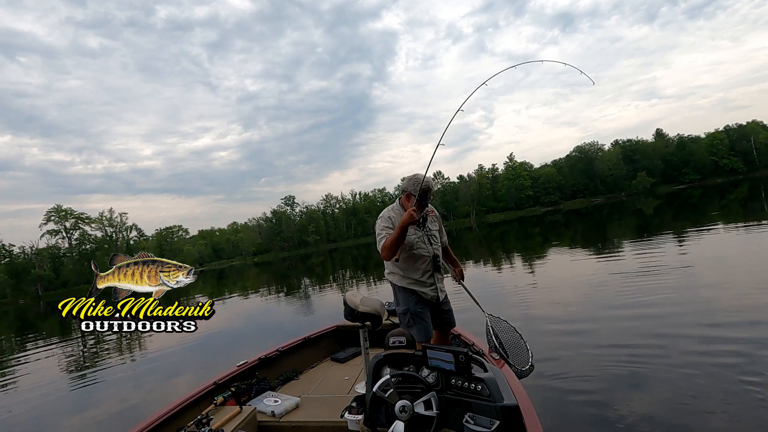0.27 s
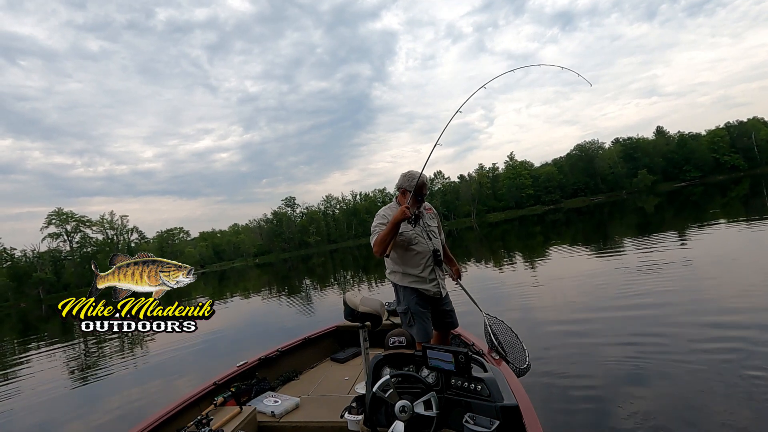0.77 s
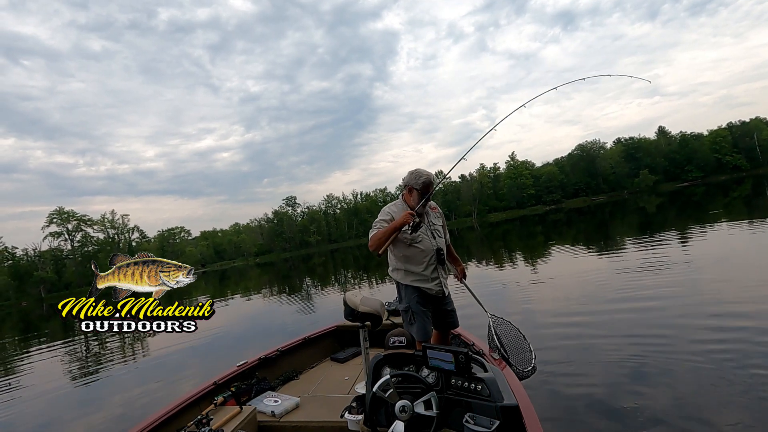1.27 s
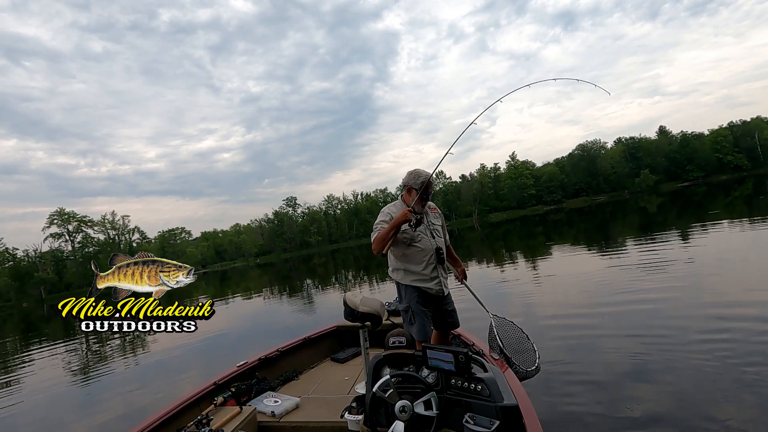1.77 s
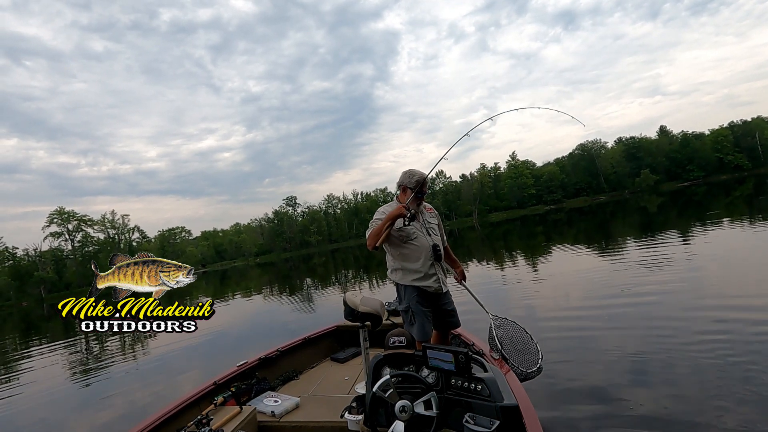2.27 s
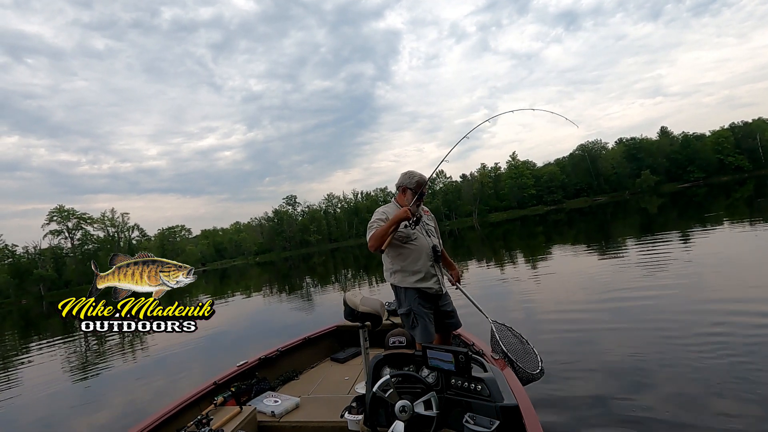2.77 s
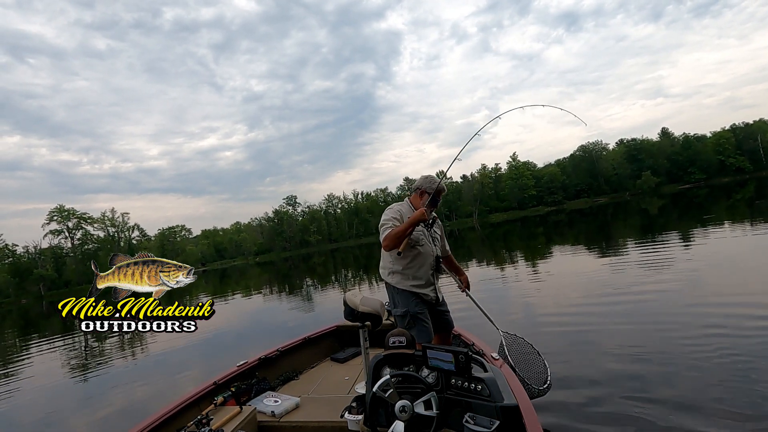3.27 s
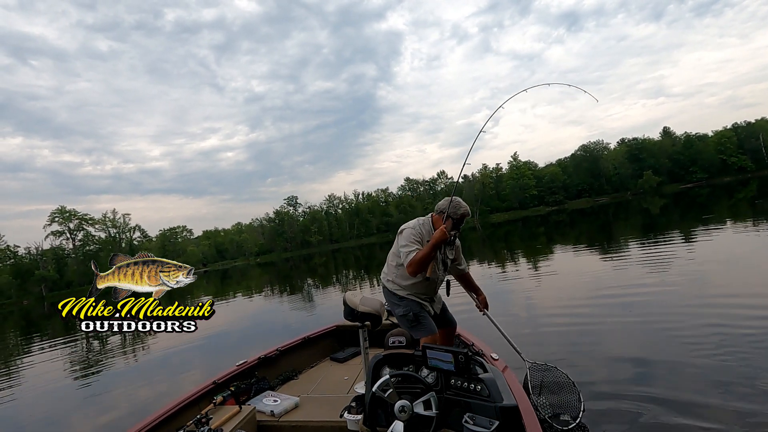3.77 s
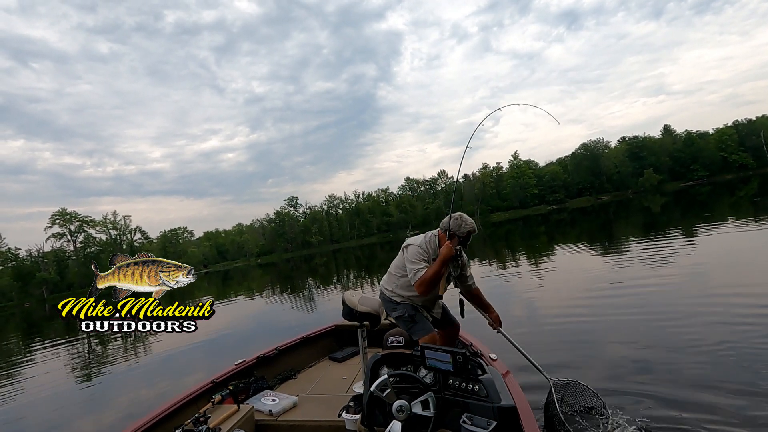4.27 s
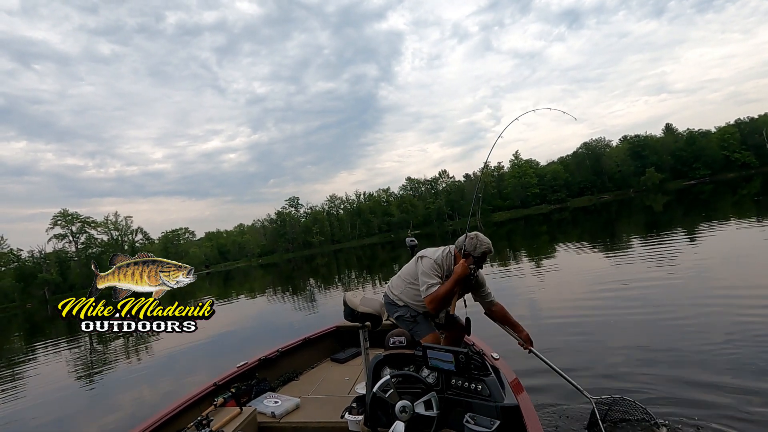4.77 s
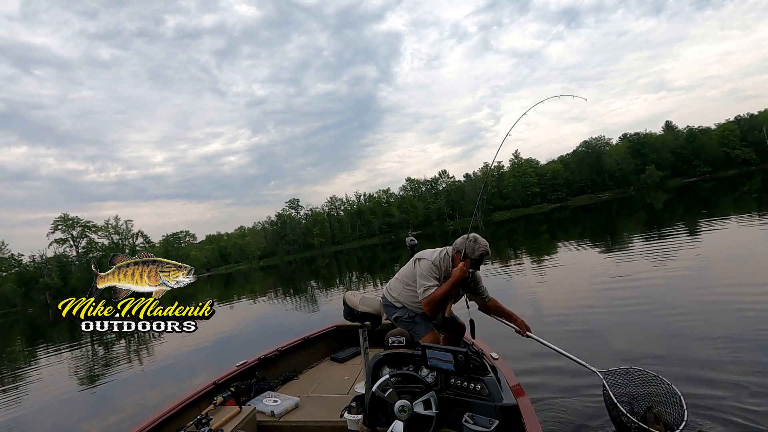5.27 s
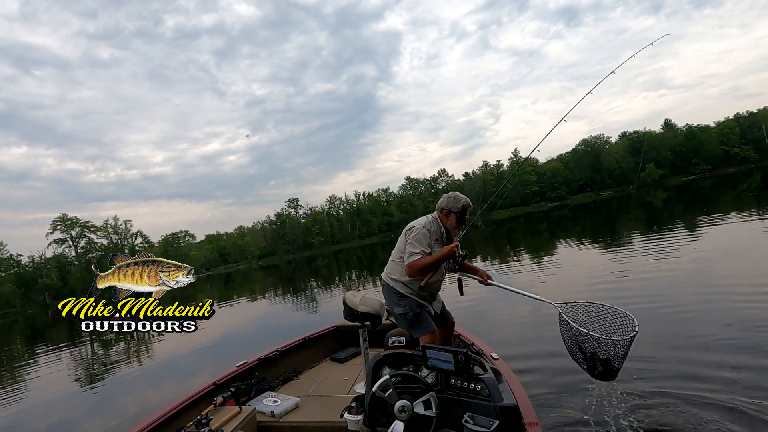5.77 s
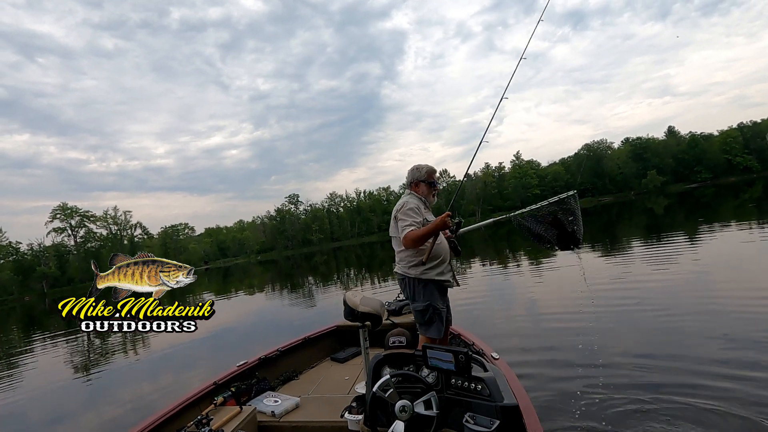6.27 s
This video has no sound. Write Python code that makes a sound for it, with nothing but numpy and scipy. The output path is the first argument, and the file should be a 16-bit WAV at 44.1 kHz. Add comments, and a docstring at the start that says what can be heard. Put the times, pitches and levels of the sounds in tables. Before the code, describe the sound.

Outdoors on calm water, heard close beside a small boat, with a very faint hum, soft air and distant, blurred bird whistles. From 0 to 1.3 s there are only single drops and small gulps, notably near 0.1 and 0.35 s; a tight cluster of plops comes at 1.35-1.5 s, then isolated plinks at 1.85 and 2.7 s. A faint gritty scrape at 2.9 s leads to a loud, bright metal knock at 3.1 s with quick rebounds and short ringing. A second scrape and dry clack at 3.7 s rattles briefly, with soft hull thumps. From 3.9 s plops and gurgles gather; 4.35-4.9 s is a lively bubbly thrash with wet slaps. It eases around 5.1-5.3 s, then builds again from 5.45 s as water spills from the rising net, densest at 5.9-6.3 s, ending in crisp, high dripping until 6.5 s.

```python
"""A hooked fish stirs calm river water beside a small fishing boat: gulps, plops and drips are single ringing
bubbles, and the churn is noise and random impulses through a bank of gliding bubble tones.
The metal net handle knocks (noise crack, falling zip, ringing modes) and scrapes (gritty noise in resonances)
on the gunwale; the fish thrashes in the net, and water pours and drips from the lifted mesh.
Behind: soft hull thumps, far birds as gliding sines, a faint low hum, light air and wind as shaped noise."""
import sys
import numpy as np
from scipy import signal
from scipy.fft import rfft, irfft, next_fast_len
from scipy.io import wavfile
from scipy.ndimage import uniform_filter1d

SR = 44100
rng = np.random.default_rng(int(sys.argv[2]) if len(sys.argv) > 2 else 0)


def materialize(psi):
    """Save the field psi as 16-bit PCM at rate SR to the path in sys.argv[1].

    A 1-D psi becomes a single channel; in a 2-D psi each row is a channel.
    """
    bounded = np.clip(np.atleast_2d(psi).T, -1, 1)
    quanta = np.round(bounded * 32767).astype(np.int16)
    wavfile.write(sys.argv[1], SR, quanta)


N = 287532

# blurred chorus of birds along the shore: (time [s], level [dB])
CHORUS_LEVEL = [(0.0, -71.5), (0.5, -82), (0.78, -66.5), (1.07, -74), (2.1, -73.5), (2.45, -69),
                (3.2, -70.5), (3.56, -72.5), (3.84, -65), (4.0, -72)]
WOBBLE_DB, WOBBLE_OCTAVES = 2, .04  # rms shake of pockets and bubbles as they ring


def gain_of(db):
    """Decibels to an amplitude factor."""
    return 10 ** (np.asarray(db) / 20)


def evened(x):
    """Scales to rms 1."""
    return x / np.sqrt(np.mean(x ** 2) + 1e-20)


def read(points, hz):
    """Reads a spectrum table on a log-frequency axis."""
    f, value = np.transpose(points)
    return np.interp(np.log(hz + 1), np.log(f + 1), value)


def along(rows):
    """Interpolates the columns of a curve table at every sample."""
    s, *columns = np.transpose(rows)
    return [np.interp(np.arange(N) / SR, s, c) for c in columns]


def add(mix, s, sound):
    """Mixes a sound in at s seconds."""
    part = mix[round(s * SR):][:len(sound)]
    part += sound[:len(part)]


def colour(x, db_of):
    """Filters by a gain in dB given as a rule of frequency."""
    hz = np.fft.rfftfreq(x.shape[-1], 1 / SR)
    return irfft(rfft(x) * gain_of(db_of(hz)), x.shape[-1])


def band(x, hz, width):
    """A resonance with gain 1 at its centre."""
    return signal.lfilter(*signal.iirpeak(hz, hz / width, SR), x)


def smooth_twice(x, size):
    """Two running averages: turns noise into slow random motion."""
    return uniform_filter1d(uniform_filter1d(x, size=size), size=size)


def bubble(hz, t60, glide, rise_s=.0006):
    """A trapped bubble: a dying tone whose pitch glides by this many octaves in each third of t60."""
    t = np.arange(0, t60 + .001, 1 / SR)
    pitch = np.minimum(hz * 2 ** (glide * t / (t60 / 3)), SR * .4)
    tone = np.sin(2 * np.pi * np.cumsum(pitch) / SR)
    return tone * gain_of(-60 * t / t60) * (1 - np.exp(-t / rise_s))


def echoes(x, t60, wet_db):
    """Direct sound plus a short scatter of reflections, different in each channel."""
    t = np.arange(round(.4 * SR)) / SR
    sparse = rng.random((2, len(t))) < .05
    taps = rng.standard_normal((2, len(t))) * sparse * gain_of(-60 * t / t60) * (t > .002)
    taps /= np.linalg.norm(taps, axis=1, keepdims=True)
    mono = np.atleast_2d(x).mean(0)[None]
    return x + gain_of(wet_db) * signal.fftconvolve(mono, taps, axes=1)[:, :N]


def gulps():
    """Air pockets of many sizes: mostly long gulps, plus a few short, steep chirps; pitch bends late, up or down."""
    # (start [s], level before fade and shake [dB], first pitch [Hz], length [s], glide [octaves],
    #  fade, negative swells [dB])
    pockets = [(0.059, -41, 608, 0.054, 1.24, 2.5), (0.354, -37.5, 660, 0.0094, 1.5, 29),
               (0.372, -56, 650, 0.016, .1, 3), (.465, -64, 600, 0.04, -0.1, 0),
               (.525, -65, 600, .03, 0.1, 3), (0.981, -58, 1045, 0.052, -.3, 6),
               (1.372, -57, 650, 0.034, 0.15, 2), (1.412, -61, 680, .03, .1, 0),
               (1.448, -40, 590, 0.03, 0.45, 7), (1.48, -57, 700, .04, -.15, 9),
               (3.204, -56, 618, 0.04, -0.2, 20), (3.945, -58, 1300, .05, -.5, 0),
               (4.043, -54, 530, 0.02, .1, 14), (4.17, -62, 440, .04, .5, -3),
               (4.208, -50, 640, 0.085, 0.1, 8), (3.845, -60, 680, .03, .1, 2), (4.3, -47, 724, .012, 0, 8),
               (4.425, -53, 1020, .015, 0, 4), (4.587, -50, 1250, .012, -.1, 6),
               (4.37, -53, 330, 0.025, 0.3, 8), (4.398, -51, 549, 0.02, 0, 4),
               (4.524, -46, 830, 0.055, -.35, 12), (4.526, -59, 397, 0.1, 0.05, 8),
               (4.59, -57, 632, .04, .3, 0), (4.615, -51, 983, .028, .35, 0),
               (4.645, -60, 663, .042, .7, -5), (4.805, -50, 760, .022, .5, 0),
               (4.822, -58, 600, .028, .15, 0), (4.873, -39, 470, 0.082, 0.45, 28),
               (5.377, -56, 652, .03, .15, 3), (5.892, -48, 955, 0.053, 0.1, 6),
               (5.988, -43, 620, 0.036, -.05, 3), (6.108, -44, 625, 0.032, -0.1, 2),
               (6.3194, -44, 2370, 0.005, 3, -13), (6.3658, -44.5, 1530, 0.0028, 1.7, -13),
               (6.4406, -39, 2900, 0.0047, 2.06, -11), (6.3987, -41, 1947, 0.01, 2, -15.5),
               (6.301, -46, 1676, .018, 2, 1), (6.392, -52.5, 1294, 0.0098, -1.5, 2),
               (6.504, -40.5, 990, 0.032, 0.5, 14)]
    out = np.zeros(N)
    shake = evened(smooth_twice(rng.standard_normal((len(pockets), 2, 6000)), 150))
    for (s, db, hz, length, glide, fade_db), (loud, wobble) in zip(pockets, shake):
        u = np.arange(0, 1, 1 / (length * SR))
        pitch = hz * 2 ** (glide * u ** 2.49 + WOBBLE_OCTAVES * wobble[:len(u)])
        edges = np.minimum(1, u * length / 0.00069) * np.minimum(1, (1 - u) / 0.2)
        level = gain_of(db - fade_db * u + WOBBLE_DB * loud[:len(u)])
        add(out, s, level * np.sin(2 * np.pi * np.cumsum(pitch) / SR) * edges)
    return out


def plops():
    """Short bubbles pinch off one by one: each tone swells, glides and dies within eight swell times."""
    # (start [s], peak before the shake [dB], pitch at 1.5 swells [Hz], swell, at least 0.0004 [s],
    #  glide over four swells [octaves])
    pinches = [(0.349, -53, 2750, 0.0018, -0.18), (0.3491, -49, 1100, 0.0014, 0.62),
               (0.382, -58, 1120, 0.0044, 0.94), (0.388, -52, 1291.0, 0.0023, 0.31),
               (0.59, -58, 1270, 0.0026, -0.47), (0.675, -55, 1370, 0.0023, 0.44),
               (0.847, -57, 1570, 0.002, 0.49), (1.3648, -54, 1560, 0.0014, -0.22),
               (1.3751, -49.5, 1863.0, 0.0022, -0.1), (1.3895, -47, 1560, 0.0023, -0.07),
               (1.409, -48, 1880, 0.0022, -0.29), (1.421, -48, 1800, 0.0015, 1.2),
               (1.4162, -47, 1120, 0.0073, -0.35), (1.4505, -45.5, 1894.0, 0.002, 0.42),
               (1.4675, -54, 2100, 0.0028, 0.38), (2.138, -62, 1390, 0.0022, -0.31),
               (2.781, -58, 1320, 0.0022, 0), (3.797, -54, 980, 0.0031, -0.35),
               (3.811, -59, 2020, 0.005, -0.1), (3.833, -52, 1560, 0.003, 0.45),
               (3.853, -55, 2490, 0.0014, 0.2), (3.929, -47.5, 1900, 0.0015, 0.94),
               (3.935, -54, 1490, 0.0015, 0.4), (3.9519, -47, 1390, 0.0017, -0.3),
               (3.9613, -40.6, 1500, 0.0014, -0.42), (4.02, -52, 1116, 0.0053, -0.42),
               (4.04, -42, 1015, 0.0027, -0.2), (4.0566, -34.5, 1180, 0.0011, -0.43),
               (4.07, -44.5, 1173, 0.0039, -0.017), (4.105, -56, 1050, 0.0073, 0.12),
               (4.1159, -51.5, 2220, 0.0022, 0.17), (4.1251, -52, 1240, 0.004, -0.49),
               (4.138, -55, 2800, 0.0013, -0.094), (4.157, -57, 1350, 0.0015, -0.42),
               (4.166, -55, 2230, 0.003, -0.24), (4.192, -49.5, 1360, 0.0036, -0.36),
               (4.2048, -48.5, 1280, 0.0056, 0.56), (4.26, -41.5, 5600, 0.00072, -0.55),
               (4.2783, -48, 1593.0, 0.0016, -0.2), (4.3576, -36.5, 784, 0.0012, 0.27),
               (4.3723, -45, 2370, 0.0059, 0.21), (4.384, -36, 1520, 0.002, 0.58),
               (4.3964, -40, 1890, 0.00086, -0.63), (4.401, -39, 4412.0, 0.0008, 0.53),
               (4.4093, -34, 3770, 0.00069, 0.62), (4.4104, -36, 1500, 0.0016, -0.091),
               (4.415, -40, 2560, 0.0014, 0.43), (4.5085, -31, 852, 0.0033, 0.14),
               (4.513, -30, 1320, 0.00086, 0.49), (4.5176, -40.5, 3800, 0.00084, -0.31),
               (4.5263, -43.8, 1240, 0.0044, 0.6), (4.603, -44, 3050, 0.0014, -0.078),
               (4.6245, -41, 2260, 0.0015, 0.35), (4.6437, -46, 2927.0, 0.0012, 0.031),
               (4.6634, -42, 3371.0, 0.00075, -0.25), (4.7096, -49, 1330, 0.0033, 0.04),
               (4.7117, -34, 1820, 0.00068, -0.43), (4.7443, -42.5, 756, 0.0022, -0.25),
               (4.7626, -44, 1419.0, 0.0011, -0.74), (4.7786, -46.5, 1266, 0.0049, 1.1),
               (4.7785, -42.5, 3859.0, 0.0017, 0.67), (4.7987, -39, 2497.0, 0.00088, -0.16),
               (4.8346, -38, 4340, 0.0011, -0.26), (4.872, -43, 2210, 0.0012, -0.12),
               (4.9874, -42.5, 1260, 0.0012, 1.6), (5.0037, -41, 1720, 0.00072, -0.041),
               (5.0146, -50, 1060, 0.0017, 0.29), (5.078, -49.5, 1430, 0.0029, -0.12),
               (5.111, -46.5, 1526, 0.0028, 0.9), (5.3512, -41.5, 2160, 0.001, 0.49),
               (5.3593, -42, 1710, 0.0011, 0.71), (5.3685, -48.5, 3300, 0.0024, 0.16),
               (5.3746, -44, 1770, 0.0022, -0.54), (5.3887, -47.5, 1020, 0.0041, -0.3),
               (5.4063, -43.5, 1430, 0.0032, -0.46), (5.472, -36, 1380, 0.0022, 0.035),
               (5.5142, -47, 4600, 0.0015, -0.039), (5.5233, -45, 2250, 0.0024, -0.15),
               (5.5258, -44, 4170, 0.0015, -0.22), (5.5491, -41, 2030, 0.0011, 0.31),
               (5.5622, -27, 1470, 0.0012, 0.025), (5.5702, -42, 2290, 0.0028, -0.0024),
               (5.58, -40.5, 1106, 0.0029, -0.11), (5.5912, -45, 3574.0, 0.00089, 0.0),
               (5.5924, -48, 1364, 0.0091, -0.86), (5.6347, -38, 2930, 0.001, 0.13),
               (5.664, -40, 1162.0, 0.0011, -0.2), (5.6744, -44, 1057, 0.0042, 0.65),
               (5.675, -41, 1610, 0.005, 0.0), (5.702, -36.5, 1330.0, 0.0006, -1.1),
               (5.7016, -47, 1000, 0.00072, -1), (5.737, -36.5, 1480, 0.00095, 0.95),
               (5.7804, -38, 890, 0.0032, -0.14), (5.7946, -32.0, 870, 0.0014, -0.77),
               (5.8093, -45, 1080, 0.0018, -0.5), (5.8102, -40, 1660, 0.0023, -0.25),
               (5.8338, -43.5, 2570, 0.0041, 0.43), (5.8359, -31, 1580, 0.0012, 0.0),
               (5.853, -40.5, 283, 0.0087, -0.18), (5.8589, -41.5, 1250, 0.0058, 0.7),
               (5.8655, -36.5, 2267.0, 0.00061, 0.4), (5.879, -43.5, 1290, 0.0041, 0.7),
               (5.8817, -43, 1580, 0.002, 0.051), (5.8927, -43.5, 1206, 0.0026, 0.17),
               (5.9302, -49, 1430, 0.00059, 0.7), (5.9802, -39, 1700, 0.0012, -0.5),
               (5.99, -41.5, 1246, 0.002, -0.77), (5.9937, -52, 3971.0, 0.0026, 0.24),
               (5.996, -44, 4440, 0.0023, 1.1), (6.0011, -38, 1862.0, 0.00082, 1.5),
               (6.0044, -54, 4140, 0.0053, 0.44), (6.0133, -36, 3760, 0.00071, 0.77),
               (6.021, -44, 1045, 0.0037, -1.1), (6.0373, -43, 1160, 0.0013, 0.0),
               (6.0488, -41, 930, 0.0013, 1), (6.0527, -36, 2080, 0.0013, -0.21),
               (6.0629, -35, 3500, 0.00069, -0.0015), (6.0703, -42.5, 1851.0, 0.0027, 0.066),
               (6.0718, -44, 860, 0.0032, 0.65), (6.1055, -53, 1033.0, 0.0033, 0.88),
               (6.109, -38, 2160, 0.0034, 0.25), (6.12, -50, 1180, 0.0036, 0.56),
               (6.1225, -36, 1730, 0.00056, 0.59), (6.128, -35, 3180, 0.0012, 1.5),
               (6.13, -51, 5060, 0.002, 0.17), (6.1356, -40, 3080, 0.0014, 0.82),
               (6.136, -42, 2680, 0.0019, 0.86), (6.1685, -40.5, 2660, 0.0056, 1.05),
               (6.1927, -37.5, 1774.0, 0.0015, -0.29), (6.2039, -47, 2000, 0.0077, -0.022),
               (6.2099, -42, 5150, 0.0008, -0.62), (6.2117, -53, 1670, 0.0014, 1.3),
               (6.2124, -42, 3270, 0.0024, 0.88), (6.225, -39, 4560, 0.00069, 0.81),
               (6.258, -41, 1970, 0.0012, 0.77), (6.2682, -46, 1820, 0.0021, 0.78),
               (6.3016, -34, 1850, 0.0007, -0.095), (6.469, -40.7, 1720, 0.00052, 0.33),
               (6.4734, -41, 2390, 0.0011, 0.66)]
    out = np.zeros(N)
    shake = evened(smooth_twice(rng.standard_normal((len(pinches), 2, 6000)), 60))
    for (s, db, hz, swell, glide), (loud, wobble) in zip(pinches, shake):
        u = np.arange(0, 8, 1 / (max(swell, .0004) * SR))
        pitch = hz * 2 ** (glide * (u - 1.5) / 4 + WOBBLE_OCTAVES * wobble[:len(u)])
        level = gain_of(db + WOBBLE_DB * loud[:len(u)])
        add(out, s, level * u * np.exp(1 - u) * np.sin(2 * np.pi * np.cumsum(pitch) / SR))
    return out


def drops():
    """Drops strike the surface: a wide burst as it tears open, a climbing trapped bubble and a bright tick."""
    # (start [s], bubble level [dB], bubble's first pitch [Hz], tick level re bubble [dB])
    strikes = [(0.0363, -46.5, 4500, -10.5), (0.0765, -35.5, 2850, -6), (0.107, -49, 2540, 0.5),
               (0.3446, -46, 2160, -28), (.698, -47.5, 2120, -28), (0.759, -36.5, 3180, -44),
               (.967, -52, 4000, -23), (1.1046, -48.5, 5170, -28), (1.1721, -48, 4850, 1.5),
               (1.2999, -44, 3060, -11), (1.3716, -41, 2820, -19), (1.405, -37, 4340, -25),
               (1.414, -47, 5450, -17), (1.462, -41.5, 4330, -39), (1.8361, -38.5, 2560, -12),
               (2.063, -57, 2280, -4), (2.3348, -50.5, 2390, -5), (2.702, -42, 4600, -3),
               (3.165, -40.5, 2670, -22), (3.5818, -49, 4360, -11), (3.9294, -45.5, 3500, -8),
               (3.949, -41, 4230, -15), (4.2575, -37, 2850, -12), (4.3333, -37.5, 2840, -10.5),
               (4.3974, -31.5, 3030, -29), (4.5077, -32.5, 2200, -22), (4.664, -46, 3740, 2),
               (4.681, -37.5, 2880, -17), (4.7091, -29, 3200, -11), (4.7316, -33, 5430, 1.5),
               (4.7347, -32, 4070, -17), (4.7464, -31, 2710, -25), (4.7622, -35, 2500, -22),
               (4.385, -28, 2770, -24), (4.7872, -34, 5450, -10), (4.825, -31.5, 3350, -15),
               (4.8508, -32.5, 1800, -25), (4.8597, -33, 2320, -18), (4.946, -36.5, 2680, -9),
               (5.1, -37.5, 2200, -26), (4.989, -47, 3140, -27.5), (5.235, -46.5, 2000, -13),
               (5.303, -46, 5040, -6), (5.323, -39, 2420, -27), (5.438, -39.5, 3140, -24),
               (5.5629, -33, 3130, -33), (5.651, -33.5, 3560, -32), (5.8065, -30, 2520, -40),
               (5.852, -28.5, 1860, -21), (5.8865, -35.5, 4000, -10), (5.918, -38, 3280, -17),
               (5.9628, -39.5, 3050, -3), (5.985, -31.5, 4100, -10), (6.0007, -33, 4540, -18),
               (6.048, -32, 2400, -8), (6.091, -37, 2630, -25), (6.2067, -31, 2020, -20),
               (6.218, -33, 3870, -24), (6.2558, -35, 5620, -9), (6.2613, -29.5, 2280, -23),
               (6.123, -40, 5550, 0.5), (6.3013, -30, 2270, -22), (6.3228, -32.5, 2820, -7),
               (6.3345, -41, 4500, -4), (6.3685, -33, 5800, -5.5), (6.3982, -26.5, 4730, -6.5),
               (6.4285, -33, 3900, -17.5), (6.455, -45, 3000, -7), (6.477, -33, 4130, -9.5)]
    longest_t60_s, largest_glide, smack_db = 0.017, 0.61, -4  # glide: octaves per third of t60
    out = np.zeros(N)
    noise = rng.standard_normal((len(strikes), 1200))
    ticks = band(noise[:, :300], 6560, 2500) * 7.84 * np.exp(-np.arange(300) / 19.0)
    smacks = band(noise[:, 300:], 4400, 1600) * np.exp(-np.arange(900) / 25.0)
    luck = rng.random((len(strikes), 2))
    for (s, db, hz, tick_db), tick, smack, (ring, climb) in zip(strikes, ticks, smacks, luck):
        trapped = bubble(hz, longest_t60_s * (1 + ring) / 2, largest_glide * climb, 0.000098)
        add(out, s, gain_of(db + smack_db) * smack)
        add(out, s, gain_of(db) * trapped)
        add(out, s, gain_of(db + tick_db) * tick)
    return out


def churn():
    """Swarms of bubbles of all sizes, released in clumps by small slaps of water, spread left and right."""
    # how hard the water churns: (time [s], level [dB], large bubbles re level [dB])
    stir = [(0, -75.5, -12), (.3, -81.5, -6.5), (1, -85, -11), (1.3, -91, 2.5), (2, -89.5, -17),
            (2.9, -89.5, 1), (3.2, -80, -7), (3.45, -82.5, -13), (3.7, -69.5, -9), (3.85, -71.5, -8),
            (3.97, -67.5, -16), (4.15, -70, -5.5), (4.25, -68.5, -6.5), (4.45, -61.5, -1), (4.6, -69.5, 0),
            (4.75, -59.5, -9.5), (4.9, -64, -7), (5.1, -69.5, 0), (5.28, -75, -9.5), (5.42, -66, -1),
            (5.6, -64, -4.5), (5.75, -66, 3.5), (5.95, -59, 3), (6.13, -58, -3), (6.155, -59, 3.5),
            (6.25, -60, -3.5), (6.4, -64, -26), (6.52, -65.5, -5)]
    # brief surges and lulls of the churn: (start [s], length [s], gain, negative is calmer [dB])
    surges = [(0.05, 0.098, 4), (0.363, 0.12, -2), (0.784, 0.15, 6.5), (1.352, 0.25, 11.5),
              (4.227, 0.14, 8), (4.365, 0.084, 9.5), (4.481, 0.14, 6.5), (4.72, 0.13, 2), (4.836, 0.047, 5),
              (5.034, 0.02, -2.5), (5.55, 0.018, 7), (5.636, 0.069, 6.5), (5.748, 0.14, 3),
              (5.954, 0.1, 3.5), (6.035, 0.064, 0.5), (6.077, 0.061, 2.5), (6.202, 0.031, 6.5),
              (6.25, 0.018, 0.5), (6.398, 0.011, 20.5)]
    # balance of bubble pitches: (frequency [Hz], gain [dB])
    swarm = [(450, -14.5), (800, 0.2), (1500, 4), (2500, 3), (4000, 7), (6000, 4.5), (9000, -2),
             (14000, -10.5)]
    sizes_hz = [706, 2230, 6000]  # centres of large, middle and fine bubbles
    fine_db, fine_follows = -75, 0.93  # fine spray at a churn level of -69 dB, and dB per dB of that level
    slaps_per_s, snap_hz, snap_db = 70., 3800, 13.5  # dry snap of a slap, dB re the middle bubbles
    bubbles_per_s, spread_db = 150.0, 3.0  # base rate at 1 kHz for each pitch; random loudness spread
    hiss_db, gurgle_db = -19.5, -3.0

    level, large = along(stir)
    levels = np.array([level + large, level, fine_db + fine_follows * (level + 69.0)])
    for s, length, db in surges:
        u = (np.arange(N) / SR - s) / length
        levels += db * np.clip(np.minimum(12 * u, 1.3 * (1 - u)), 0, 1)

    # slaps raise the chance of bubbles; calm water keeps a steadier trickle
    slaps = (rng.random(N) < slaps_per_s / SR) * np.minimum(rng.exponential(1, N), 1.6)
    t = np.arange(2000) / SR
    burst = 2.0 * np.exp(-t / 0.0043) * (1 - np.exp(-t / 0.0011))
    clumps = 0.27 + np.clip((-72 - level) / 8, 0, 2) + signal.oaconvolve(slaps, burst)[:N]
    spray = gain_of(hiss_db) * rng.standard_normal((2, N))
    spray[1] = 3.75 * spray[0] + 2.0 * spray[1]
    spray, clumped = spray.astype(np.float32), evened(clumps ** 0.051)

    size = next_fast_len(N + 6000)
    total = np.zeros((2, size // 2 + 1), complex)
    for k, hz in enumerate(np.geomspace(400, 14000, 44)):
        chance, luck = rng.random(N, np.float32), rng.random(2)
        gurgle = k % 2 and hz < 8000  # every other pitch: rarer bubbles that ring long
        rate = bubbles_per_s * np.sqrt(hz / 1000)
        if gurgle:
            cycles, glide = 30 + 40 * luck[0], -0.05 + 0.5 * luck[1]
            rate *= .3
        else:
            cycles, glide = 5 + 14 * luck[0], 0.0055 + 0.723 * luck[1]
        at = np.flatnonzero(chance < rate * clumps / SR)
        big, side = rng.random((len(at), 2)).T
        loud_db = spread_db * np.minimum(-np.log(big + 1e-9), 4)
        drive = np.zeros((2, N), np.float32)
        drive[:, at] = gain_of(loud_db + np.outer([1, -1], 1.7 * (side - .5)))
        drive = evened(drive)
        if gurgle:
            drive = gain_of(gurgle_db - 6.4 * max(np.log2(hz / 2500), 0)) * drive
        else:
            drive = drive + np.roll(spray, 999 * k, axis=1) * clumped * np.sqrt(hz / 2500)
        shares = [np.interp(np.log(hz), np.log(sizes_hz), row) for row in np.eye(3)]
        drive = np.float32(drive * gain_of(np.float32(shares @ levels + read(swarm, hz))))
        ring = bubble(hz, cycles / hz, glide, 2.0 / hz)
        total += rfft(drive, size) * rfft(np.float32(ring / np.linalg.norm(ring)), size)

    sides = gain_of(np.outer([1, -1], 3 * (rng.random(N) - .5)))
    snaps = slaps ** 2 * gain_of(levels[1] + snap_db) * sides
    total += rfft(snaps, size) * rfft(bubble(snap_hz, 5.8 / snap_hz, -.3, .00003), size)
    return irfft(total, size)[:, :N]


def knocks():
    """The net handle strikes the gunwale: a noise crack, a falling zip along the tube and ringing modes."""
    # (start [s], level [dB], contact decay [s], tilt about 3 kHz [dB per octave], ring re level [dB],
    #  zip length [s])
    hits = [(3.078, -10.5, .005, 5, -3, .0058), (3.0838, -18.5, .005, 1, 2, .002),
            (3.089, -25, .015, -4, -6, .002), (3.1245, -28.5, .006, 4, 3, .0048),
            (3.6893, -14.5, .0007, 5, -14, .001), (3.7035, -26, .005, 1, -9, .0015),
            (3.7165, -32, .0024, -4, -3, .002), (3.7335, -40, .003, 7, -6, .0015),
            (3.7407, -28, .0015, 5, -9, .0015), (3.7452, -31, .0015, 9, -9, .0015),
            (3.762, -42, .003, 0, -6, .002), (3.799, -43, .004, -6, -3, .002)]
    # modes of handle and gunwale: (frequency [Hz], gain before tilt [dB], t60 [s])
    metal = [(180, -5.5, 0.21), (244.4, -11, 0.36), (376, -2.5, 0.11), (463, 3.5, 0.054), (1248, 11, 0.049),
             (1690, 2.5, 0.13), (2183, 2, 0.049), (2450, -8, 0.034), (2715, 17, 0.037), (2860, 5.5, 0.052),
             (3230, -12, 0.037), (4040, -6, 0.039), (4200, 5, 0.064), (4380, 4.5, 0.06), (5080, -1, 0.035),
             (5110, 1, 0.038), (5820, -1, 0.044), (6600, 2.5, 0.045)]
    # crack colour before tilt: (frequency [Hz], gain [dB])
    crack_colour = [(60, -68), (200, 1), (700, 3), (1300, 13.5), (1700, 14.5), (1950, 0), (2300, 20),
                    (2800, 17.5), (4500, 14.5), (7000, 4.5), (10000, -2.5), (15000, -7)]
    zip_base_db, zip_per_tilt = -12, 1.87  # bright knocks zip more
    rise_share, delay_share = .8, .5  # blow's rise and zip's delay, in zip lengths
    out, t = np.zeros(N), np.arange(round(.3 * SR)) / SR
    fade = signal.windows.tukey(2 * len(t), .3)[len(t):]
    for row, noise in zip(hits, rng.standard_normal((len(hits), len(t)))):
        s, db, contact, tilt_db, ring_db, zip_s = row
        rise, delay = rise_share * zip_s, delay_share * zip_s
        zip_gain = gain_of(min(zip_base_db + zip_per_tilt * tilt_db, 0))
        blow = noise * np.where(t < rise, (t / rise) ** 2, np.exp(-(t - rise) / contact))
        crack = colour(blow, lambda f: read(crack_colour, f) + tilt_db * np.log2(f / 3000 + 0.01))
        modes = np.zeros(len(t))
        for f, mode_db, t60 in metal:
            decay = gain_of(mode_db + tilt_db * np.log2(f / 3000) - 60 * t / t60)
            modes += decay * np.sin(2 * np.pi * f * (t - rise))
        ring = modes * np.minimum(t / rise, 1) ** 2  # the ring builds up while the contact grows
        u = np.clip((t - delay) / zip_s, 0, 1)  # bending waves: the treble arrives first
        zip_pitch = 2600 + 4600 * (1 - u) ** 2.13
        zips = np.sin(2 * np.pi * np.cumsum(zip_pitch) / SR) * np.sin(np.pi * u) ** 0.43
        # the zip keeps to the middle band, with no bass
        zips = colour(zips, lambda f: read([(600, -26), (1500, 6.5), (2400, -5.5)], f))
        knock = zip_gain * zips
        knock += 0.94 * (1 - 0.33 * zip_gain) * crack / abs(crack).max()
        knock += gain_of(ring_db) * ring / abs(ring).max()
        add(out, s, gain_of(db) * knock * fade)
    return out


def slides():
    """The handle slides along the gunwale: gritty noise makes narrow bands of the metal sing."""
    # one list for each slide: (time [s], level [dB])
    rubs = [
        [(2.88, -80.5), (2.884, -77), (2.902, -59), (2.958, -55.5), (3.05, -77), (3.07, -49)],
        [(3.62, -61), (3.68, -55), (3.69, -35)],
    ]
    # singing bands: (frequency [Hz], width [Hz], gain before tilt [dB])
    singing = [(2338, 26, 8.5), (2490, 38, 5), (3580, 52, 2.5), (4380, 43, 6), (4610, 100, 0.5),
               (5400, 50, 0), (7350, 140, -9)]
    # tilt below 4600 Hz, one for each slide: [dB per octave]
    tilts = [0, 9]
    out = np.zeros(N)
    for rows, tilt_db in zip(rubs, tilts):
        s, db = np.transpose(rows)
        span = np.arange(s[0], s[-1], 1 / SR)
        noise = rng.standard_normal(len(span))
        roughness = evened(uniform_filter1d(rng.standard_normal(len(span)), size=200))
        grit = noise * gain_of(3.3 * roughness)
        sing = np.zeros(len(span))
        for f, width, band_db in singing:
            sing += gain_of(band_db + tilt_db * np.log2(min(f, 4600) / 4600)) * band(grit, f, width)
        level = gain_of(np.interp(span, s, db))
        add(out, s[0], level * evened(sing) * signal.windows.tukey(len(span), .1))
    return out


def hull():
    """The angler shifts: each soft thump is a few low swings that swell, sag in pitch and die."""
    # (start [s], level [dB], nominal pitch, swept from 1.3 to 0.72 times [Hz], length [s])
    thumps = [(1.11, -68, 35.0, 0.098), (1.768, -65.5, 48.4, 0.1), (3.105, -52, 40.4, 0.062),
              (3.553, -51.5, 44, 0.074), (3.702, -45.5, 169, 0.06), (3.746, -51, 32.3, 0.041),
              (3.79, -53, 200, 0.022), (3.87, -53.5, 34, 0.065), (5.945, -53.5, 163, 0.056),
              (6.21, -53, 200, 0.087), (6.293, -49.5, 44.7, 0.1)]
    out = np.zeros(N)
    for s, db, hz, length in thumps:
        u = np.arange(0, 1, 1 / (length * SR))
        swing = np.sin(2 * np.pi * hz * length * u * (1.3 - 0.29 * u))
        add(out, s, gain_of(db) * swing * np.sin(np.pi * u ** 0.41) ** 2)
    return out


def birds():
    """Far near-sine whistles over the chorus voices, fluttering in moving air and smeared by the trees."""
    # (start [s], length [s], level before flutter [dB], first, middle and last pitch before smoothing [Hz])
    whistles = [(0.539, 0.078, -64, 5350, 3200, 2100), (0.616, 0.033, -67, 2600, 3430, 3870),
                (0.654, 0.051, -65, 3950, 4020, 4220), (0.769, 0.15, -66.5, 3200, 3230, 3190),
                (0.843, 0.038, -60.5, 2350, 2450, 2620), (.88, 0.1, -73, 2320, 2600, 2400),
                (1.564, 0.042, -67, 4800, 4950, 4960), (1.63, 0.056, -64, 3300, 2980, 2270),
                (1.702, 0.069, -65.5, 2820, 3080, 2300), (1.77, 0.057, -63.5, 2360, 2980, 3570),
                (1.876, 0.21, -77.5, 5480, 5290, 5360), (2.411, 0.078, -62, 2910, 2985, 2380),
                (2.472, 0.06, -61.5, 2300, 2530, 2170), (2.474, 0.051, -66, 4700, 3590, 3080),
                (2.586, 0.055, -64.5, 4900, 3670, 3100), (2.629, 0.11, -70, 2500, 2510, 2740),
                (2.772, .05, -67, 2900, 3000, 3260), (3.37, 0.062, -71.5, 4730, 4910, 4880),
                (3.466, 0.075, -71, 4560, 3220, 2400), (3.535, 0.053, -73, 2300, 3210, 2870)]
    out = warblers()
    for s, length, db, *hz in whistles:
        pitch = np.interp(np.arange(0, 2, 2 / (length * SR)), range(3), hz)
        pitch = uniform_filter1d(pitch, size=400)
        tone = np.sin(2 * np.pi * np.cumsum(pitch) / SR)
        add(out, s, gain_of(db) * tone * signal.windows.tukey(len(pitch), .6))
    out *= gain_of(2.6 * evened(smooth_twice(rng.standard_normal(N), 350)))
    return echoes(out * gain_of([[1.5], [-1.5]]), 0.56, -1.8)


def warblers(count=9):
    """The far chorus: several voices whose pitch wanders and which break off at random."""
    slow = smooth_twice(rng.standard_normal((2, count, N // 64 + 2)), 22)
    wander, effort = (np.repeat(evened(v), 64, axis=1)[:, :N] for v in slow)
    centres = np.geomspace(2350, 3900, count)[:, None]
    hz = centres * 2 ** (0.095 * uniform_filter1d(wander, size=64))
    singing = uniform_filter1d(np.clip(effort - .5, 0, 1), size=200)
    voices = np.sin(2 * np.pi * np.cumsum(hz, axis=1) / SR) * singing
    return gain_of(along(CHORUS_LEVEL)[0] - 6) * evened(voices.sum(0))  # 6 dB under the blur


def air():
    """Patchy hiss, hum, the chorus blur and low wind puffs, all from random short-time spectra."""
    # still air over the water: (frequency [Hz], relative density [dB per Hz])
    air_spectrum = [(15, -1.5), (25, -10), (74, -27.5), (145, 1.5), (373, -11), (405, -14.5), (476, -12),
                    (591, -19), (1370, -15.5), (1740, -56), (4740, -23.5), (5430, -29.5), (7920, -40.5),
                    (11300, -50.5), (16000, -57)]
    # (frequency [Hz], left-right likeness [-1 to 1])
    likeness = [(60, 1), (180, 0.83), (550, 0.2), (5000, 0.38)]
    # (frequency [Hz], left minus right [dB])
    air_lean = [(60, 2), (500, -6), (3800, 6), (15000, 37)]
    # wavering bands of the distant hum: (frequency [Hz], width of each of two filter passes [Hz], level [dB])
    hum_bands = [(136, 4.4, -72), (199, 82, -78.5)]
    # light wind on the microphone, before random swell: (time [s], level [dB])
    wind = [(0, -84), (.6, -72), (1.2, -71.5), (2.2, -68.5), (2.9, -72), (3.45, -76), (3.78, -61),
            (4.1, -81), (4.4, -64.5), (4.8, -90), (5.4, -71), (5.9, -85), (6.2, -60.5), (6.52, -81)]
    air_db = -65
    puff_swell_db, puff_s = 3, .04  # rms swell before smoothing, its time constant

    frames, hz = N // 256 + 5, np.fft.rfftfreq(1024, 1 / SR)
    a, b, c, d, patches = rng.standard_normal((frames, 513, 5)).T
    patches = evened(uniform_filter1d(uniform_filter1d(patches, 10, 0), 10, 1))
    same, left = np.clip(read(likeness, hz), -1, 1)[:, None], a + 1j * b
    right = same * left + np.sqrt(1 - same ** 2) * (c + 1j * d)
    z = np.array([left, right]) * gain_of(np.outer([.5, -.5], read(air_lean, hz)))[:, :, None]

    def patchy(depth_db):
        noise = signal.istft(z * gain_of(depth_db * patches), nperseg=1024, noverlap=768)[1]
        return evened(noise[:, :N])

    wide, lumpy = patchy(0.5), patchy(3.5)
    hiss = gain_of(air_db) * evened(colour(wide, lambda f: read(air_spectrum, f)))
    hum = sum(gain_of(db) * evened(band(band(lumpy, f, w), f, w)) for f, w, db in hum_bands)
    blur = evened(band(band(lumpy, 2800, 1300), 2800, 1300))
    chorus = gain_of(along(CHORUS_LEVEL)[0]) * blur
    swell = evened(signal.lfilter([1], [1, -np.exp(-1 / (puff_s * SR))], rng.standard_normal(N)))
    rumble_colour = [(15, -40), (40, -7.0), (90, -12.0), (200, -8), (400, -72)]  # (Hz, dB)
    rumble = evened(colour(wide, lambda f: read(rumble_colour, f)))
    puffs = gain_of(along(wind)[0] + puff_swell_db * uniform_filter1d(swell, size=800)) * rumble
    return hiss + hum + chorus + puffs


def scene():
    """Near water and metal reach the two ports from the right; birds, air and hull thumps join them."""
    # phase between the microphone ports: (frequency [Hz], left leads by [rad])
    port_phase = [(100, 0.0), (1000, -.2), (3400, -.7), (11000, .1), (14600, 1.1)]
    # near sounds: (frequency [Hz], left minus right [dB])
    near_lean = [(60, 1), (240, 0), (950, -2.5), (3800, -2), (15000, 1.5)]
    water = echoes(gulps() + plops() + drops(), 0.063, -8.5)
    metal = echoes(knocks() + slides(), 0.3, -16.5)
    near = water + metal + churn()
    hz = np.fft.rfftfreq(N, 1 / SR)
    ports = np.exp(.5j * np.outer([1, -1], read(port_phase, hz)))
    ports = ports * gain_of(np.outer([.5, -.5], read(near_lean, hz)))
    return irfft(rfft(near) * ports, N) + birds() + air() + hull()


def record(dry):
    """The microphone dulls the top octave; a steep low-pass then limits the band."""
    # treble roll-off: (frequency [Hz], gain [dB])
    mic_response = [(8000, 0.63), (12000, -7), (14000, -11), (15500, -22)]
    edge_hz = 15800
    dull = colour(dry, lambda f: read(mic_response, f))
    low_pass = signal.firwin(511, edge_hz, window=("kaiser", 9), fs=SR)
    return signal.oaconvolve(dull, low_pass[None], "same")


dry = scene()
out = record(dry)
materialize(out)
```